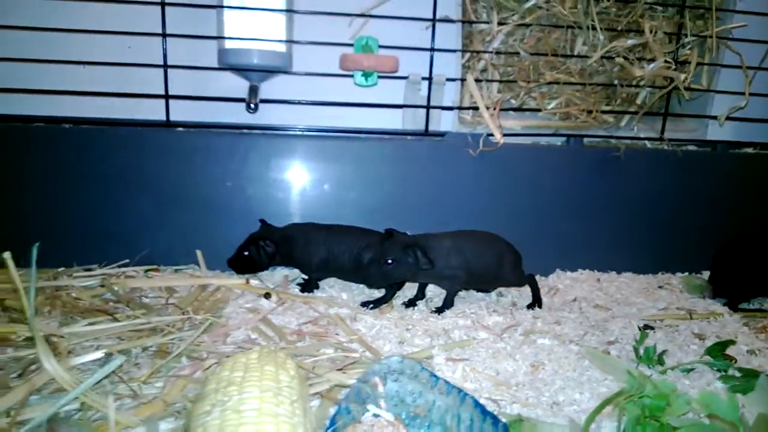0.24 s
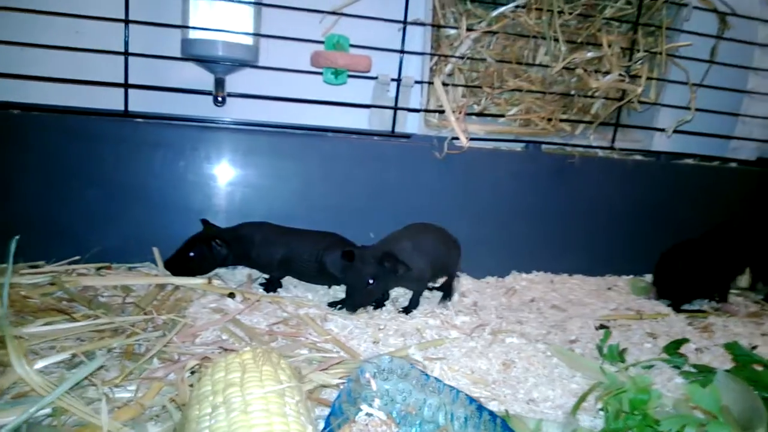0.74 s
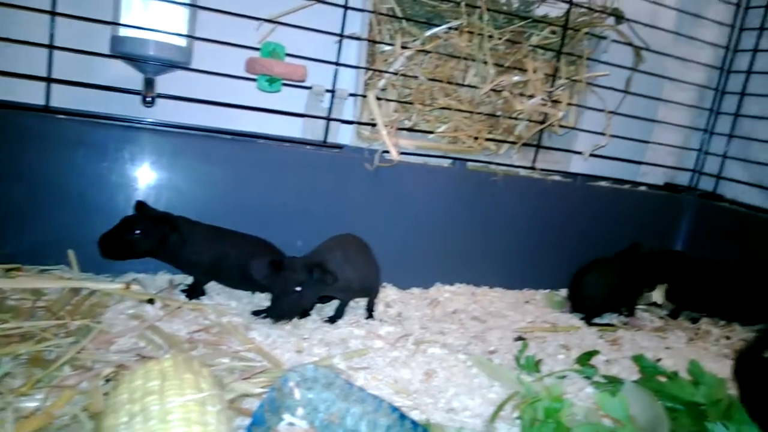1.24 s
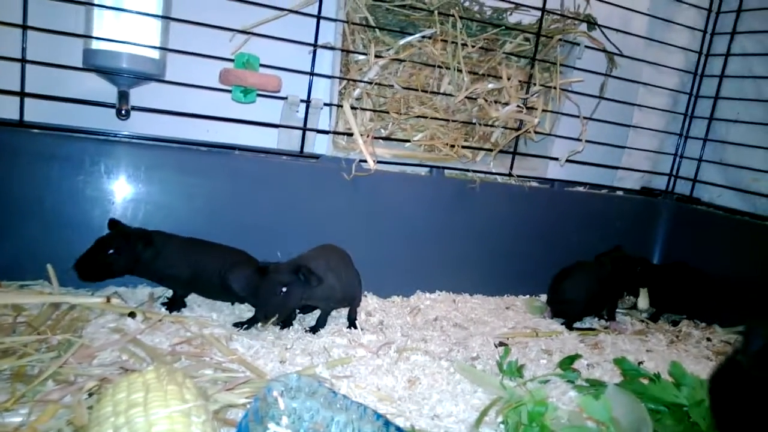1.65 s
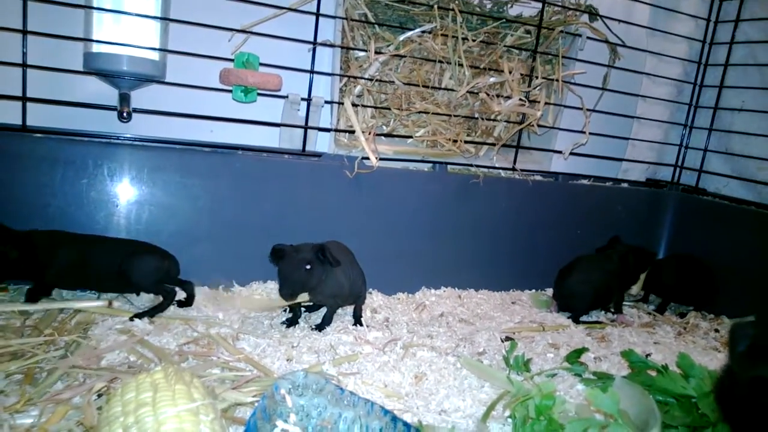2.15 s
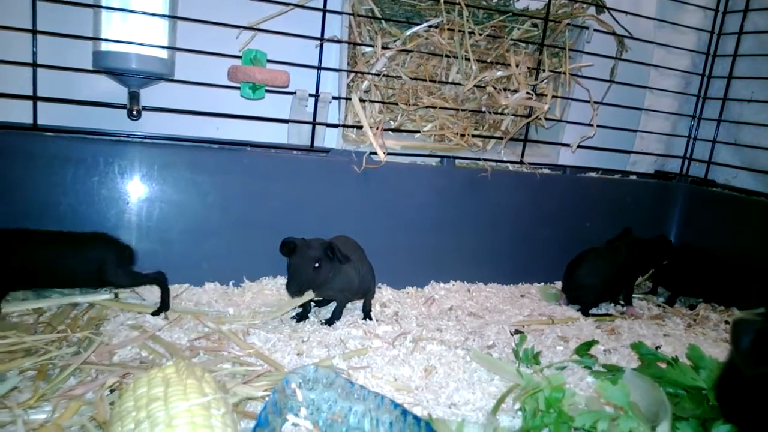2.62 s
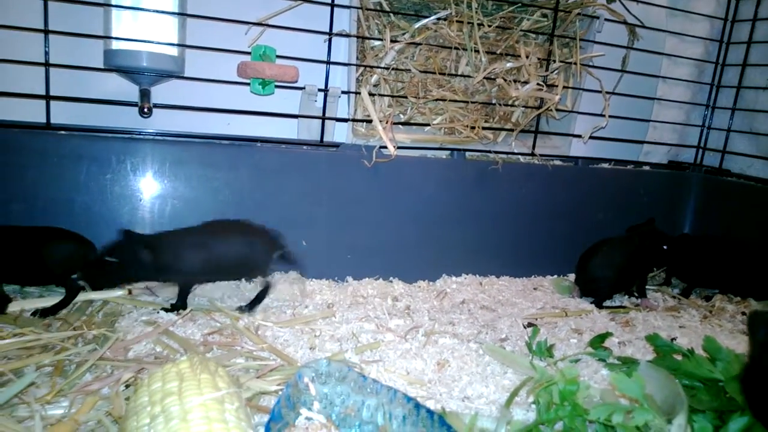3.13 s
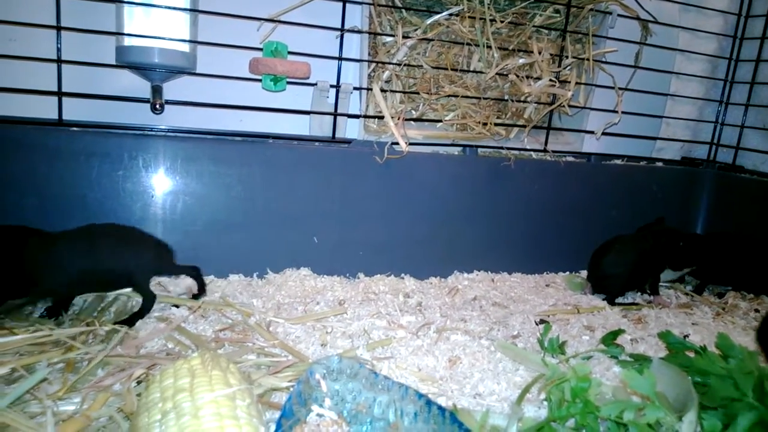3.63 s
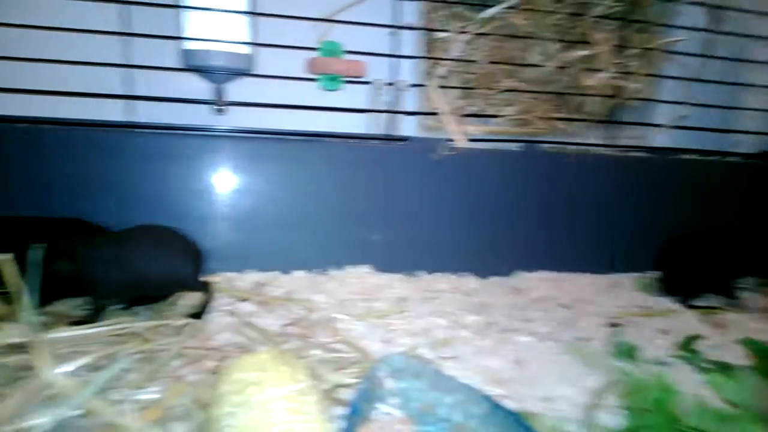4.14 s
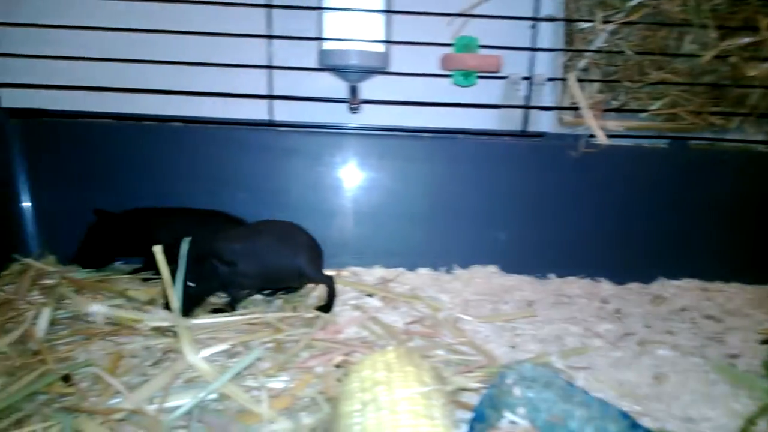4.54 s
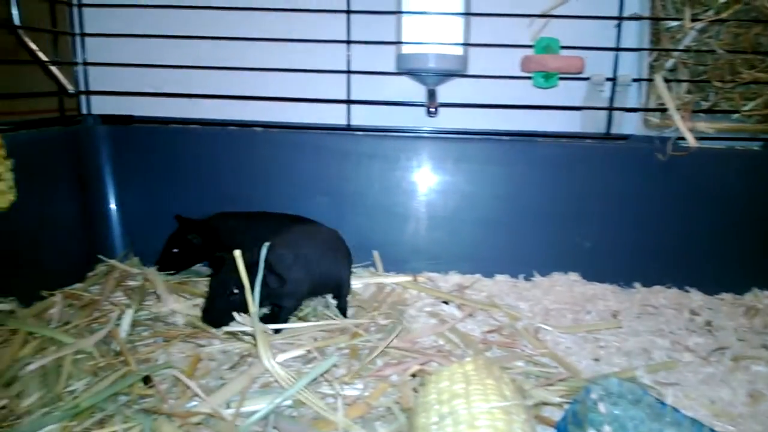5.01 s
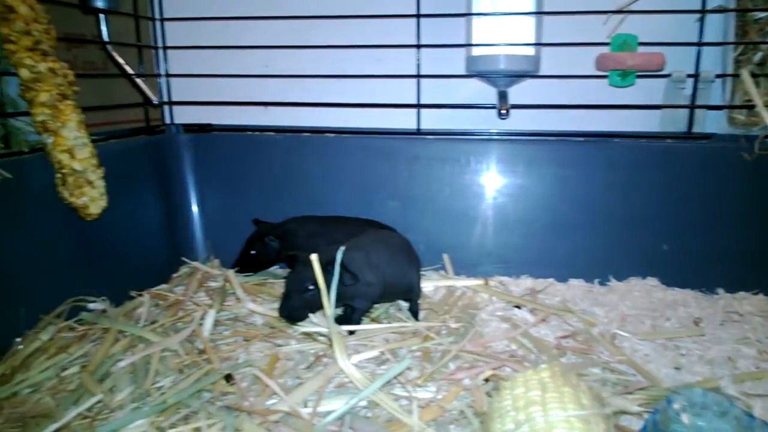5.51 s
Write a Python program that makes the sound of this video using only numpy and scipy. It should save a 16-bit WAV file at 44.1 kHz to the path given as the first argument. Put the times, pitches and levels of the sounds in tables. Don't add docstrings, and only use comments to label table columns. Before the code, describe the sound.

Young guinea pigs chirp in a plastic-floored cage: brief, nearly pure whistles, each flicking up in pitch. Faint, slightly hoarse chirps come first, then a louder run in the middle and sparse ones at the end. A dry straw snap stands out near two seconds. A hand-held microphone adds low rumble, faint hiss and irregular tiny dropout clicks.

```python
import sys
import numpy as np
from scipy import signal
from scipy.io import wavfile
from scipy.ndimage import uniform_filter1d

SR = 44100
rng = np.random.default_rng(int(sys.argv[2]) if len(sys.argv) > 2 else 0)


def linear_from_db(decibels):
    return 10 ** (np.asarray(decibels, float) / 20)


def master_out(mix):
    frames = np.transpose(np.atleast_2d(mix))
    ceiling = np.clip(frames, -1, 1)
    pcm = np.round(ceiling * 32767).astype(np.int16)
    wavfile.write(sys.argv[1], SR, pcm)


N = 254456

# (start [s], length [s], level [dB], held pitch [Hz], flick top [Hz])
NASAL_CHIRPS = [
    (.369, 0.07, -46, 637.6, 896),
    (.525, 0.07, -44, 673, 973),
]
CLEAR_CHIRPS = [
    (2.589, 0.06, -36.5, 696, 980),
    (2.740, 0.059, -35, 674, 1020),
    (2.894, .064, -37, 658, 1040),
]
BRIGHT_CHIRPS = [
    (2.445, .060, -38.5, 699, 1033),
    (3.409, .059, -36, 586.7, 934),
    (3.888, 0.067, -37.5, 620.3, 893),
    (5.74, 0.05, -38, 592.6, 853),
]
SUDDEN_CHIRPS = [
    (1.029, .068, -44.5, 670, 957),
    (1.794, 0.059, -41.5, 609, 822),
    (1.939, .054, -40.5, 611, 897),
]
SWELLING_CHIRPS = [
    (3.266, 0.065, -38, 618, 935),
    (3.585, .047, -42.5, 671, 806),
    (5.600, 0.063, -37.5, 569, 856),
]
DULL_CHIRPS = [(1.618, 0.073, -46, 641, 820), (2.098, 0.058, -42, 606.6, 880),
               (2.298, .063, -44, 645.7, 880), (3.758, .049, -44, 688.3, 879), (4.562, .038, -43, 610, 870),
               (4.719, .055, -41.5, 689, 835)]
HOARSE_CHIRPS = [
    (.205, .064, -50, 755, 981),
    (1.216, .070, -51.5, 657.6, 960),
    (1.448, 0.068, -56.5, 765, 1000),
]
PIP_CHIRPS = [(.891, .060, -51.5, 659, 987), (3.138, 0.023, -44.5, 503, 510), (3.179, 0.013, -58, 797, 830),
              (4.536, .042, -48, 1117, 852), (5.450, 0.023, -42, 514, 465), (5.488, 0.012, -39.5, 780, 754),
              (5.660, 0.019, -45.5, 692, 800)]
# (flick start before the end [s], creep [share of held pitch],
# onset relative to level [dB], end relative to level [dB])
CHIRP_SHAPES = [
    (.020, .01, -1, -4),
    (.016, .02, -6.5, -5),
    (0.024, .02, -4, -1.5),
    (.023, 0.018, 3.8, -2),
    (0.024, -.02, -11.5, -1.5),
    (.020, -0.031, -9, .5),
    (0.02, -.03, -7, 0),
    (.04, 0.0066, -10, -2.5),
]
# (octave overtone [dB], rasp [dB])
CHIRP_VOICES = [
    (-5, -10),
    (-16.5, -17),
    (-15, -14),
    (-17, -13),
    (-13.5, -11.5),
    (-26.5, -10),
    (-23, -4),
    (-37, -13.5),
]
# (time [s], peak [dB], centre [Hz], t60 [s], body under the snap [dB])
STRAW_SNAPS = [(1.539, -50, 4200, 0.016, -32), (1.8363, -53, 6870, 0.032, 13),
               (1.871, -45.5, 7310, 0.13, -11), (1.8818, -48, 7650, 0.024, -7),
               (1.889, -30, 7550, 0.019, -10), (1.901, -50, 8600, 0.053, -26),
               (1.9486, -54.5, 3700, 0.094, 3), (2.0113, -50, 5030, 0.017, -2),
               (2.071, -48, 3820, 0.043, 2), (2.61, -58, 3720, 0.036, -5),
               (3.046, -51.5, 5600, 0.091, -13.5), (3.3489, -52.5, 5710, 0.033, -18),
               (4.111, -65, 2980, 0.045, 20), (5.0106, -51.5, 4650, 0.15, -4.5),
               (5.0376, -59, 4980, 0.18, 3), (5.223, -51, 1760, 0.054, -6), (5.306, -48, 4040, 0.094, -4.5),
               (5.4246, -57.5, 7900, 0.089, 1.5)]
# (time [s], peak [dB], centre [Hz])
SHAVING_TICKS = [(2.0254, -58, 8900), (2.0308, -60, 8030), (2.0493, -58, 4450), (2.178, -62, 3320),
                 (2.3834, -60, 4270), (2.5708, -66, 3500), (5.3244, -63, 6300), (5.579, -58, 4900)]
# (frequency [Hz], width [Hz], level [dB])
STALK_MODES = [(5220, 400, -6), (7350, 700, 0), (10800, 1500, -12), (12700, 500, -7)]
# (frequency [Hz], t60 [s])
CAGE_DECAY = [(300, .12), (900, .19), (2000, .12), (8000, .07)]
# (end [s], jump at start [dB], jump at end [dB])
BUFFER_SLIPS = [(.4237, -50, -43), (.5537, -52, -47), (.5737, -39, -37), (1.0537, -66, -42),
                (2.3137, -46, -59), (2.3237, -66, -46), (2.4737, -51, -34), (2.4937, -34, -40),
                (2.5037, -53, -48), (2.6337, -40, -41), (2.7937, -57, -31), (2.9537, -58, -33),
                (3.2837, -40, -43), (3.2937, -60, -37), (3.4337, -42, -33), (3.4537, -66, -38),
                (3.5937, -45, -37), (3.6237, -53, -39), (3.9137, -41, -42), (3.9237, -66, -39),
                (4.5837, -66, -44), (4.7237, -43, -50),
                (.2537, -52, -55), (.2637, -49, -58), (1.1937, -53, -51), (1.3837, -61, -51),
              (1.8537, -61, -51), (3.7537, -53, -53), (4.2337, -53, -66), (4.3937, -52, -61),
              (4.5537, -66, -51), (5.1937, -66, -52), (.7237, -53, -46), (1.2237, -48, -56),
              (1.3537, -43, -55), (1.3637, -46, -66), (2.8237, -41, -41), (2.9837, -52, -44),
              (3.1137, -66, -48), (3.1237, -52, -46), (3.1337, -53, -51), (4.0837, -45, -41),
              (4.1037, -48, -42), (4.8937, -60, -48), (5.0337, -58, -44), (5.0437, -50, -53),
              (5.2237, -49, -66), (5.5137, -66, -41), (5.5337, -57, -48), (5.6937, -40, -47)]
# (frequency [Hz], level [dB])
ROOM_BOOMS = [(28, -6.5), (49, -2.5), (88, -1)]
# (time [s], effort [dB])
HAND_EFFORT = [(0.0, -47.5), (0.11, -64), (0.26, -50.5), (0.48, -55), (1.39, -55), (2.97, -49.5),
               (3.19, -61.5), (3.27, -52), (3.58, -50.5), (3.83, -60.5), (4.03, -49), (4.33, -58),
               (4.59, -52.5), (4.62, -58), (5.42, -47.5), (5.45, -50.5), (5.7, -51.5), (5.76, -54)]
# (time [s], level [dB])
MACHINE_LEVEL = [(0.0, -60), (1.59, -65), (2.95, -50.5), (3.11, -63.5), (3.53, -51), (3.75, -76),
                 (3.9, -61.5), (5.63, -60), (5.76, -71.5)]
# (frequency [Hz], level per Hz [dB])
RUMBLE_SPECTRUM = [(15, -3), (30, -6.5), (70, -1), (110, 2.5), (145, 0.5), (175, -13), (260, -24.5),
                   (400, -46.5)]
# (start [s], dying time [s], level [dB])
SCUFF_EVENTS = [(1.8, 0.43, -73.5), (4.928, .06, -68.5), (5.0, 0.26, -78.5), (5.223, 0.18, -62),
                (5.398, 0.29, -62), (5.6, 0.39, -68.5)]
# (frequency [Hz], level per Hz [dB])
SCUFF_SPECTRUM = [(120, -21), (200, 1), (320, 5.5), (450, -6), (800, -9), (1900, -16.5), (5000, -72)]
# (frequency [Hz], level per Hz [dB])
HISS_SPECTRUM = [(300, -12), (800, -5), (1600, -2.5), (2800, -4), (4500, -3.5), (5500, -7.5), (6800, -8),
                 (8300, -11.5), (15500, -17.5)]
# (multiple of its base pitch, level [dB])
WHINE_COMB = [(5, -91), (6, -90), (7, -97), (8, -91), (9, -93)]


def evened(x):
    return x / np.sqrt(np.mean(x ** 2) + 1e-20)


def wander(x, first, second):
    return evened(uniform_filter1d(uniform_filter1d(x, size=first), size=second))


def read(points, hz):
    f, value = np.transpose(points)
    return np.interp(np.log(hz + 1), np.log(f + 1), value)


def add(mix, s, sound):
    part = mix[round(s * SR):][:len(sound)]
    part += sound[:len(part)]


def resonate(x, hz, width):
    turn = np.exp(2j * np.pi * np.cumsum(hz * np.ones(len(x))) / SR)
    r = np.exp(-np.pi * width / SR)
    return 2 * (turn * signal.lfilter([1 - r], [1, -r], x / turn)).real


def contour(start, length, level_db, hz, top_hz, flick_s, creep, onset_db, end_db):
    attack_s, top_s, release_s = 0.003, 0.0083, 0.007
    catch_db, silent_db = -2, -22
    flick = length - min(flick_s, 0.6 * length)
    top = length - min(top_s, 0.2 * length)
    scoop_end = 0.42 * flick
    full = min(0.48 * length, flick)
    close = length - min(release_s, 0.14 * length)
    s = np.sort([0, attack_s, scoop_end, full, flick, (flick + top) / 2, top, close, length])
    pitch = np.interp(s, [0, scoop_end, flick, top, length],
                      [0.79 * hz, hz * (1 - creep), hz * (1 + creep), top_hz, 0.94 * top_hz])
    rise = np.interp(s, [0, attack_s, full], [silent_db, onset_db, 0])
    fall = np.interp(s, [full, flick, top, close, length], [0, catch_db, end_db, end_db, silent_db])
    return np.transpose([start + s, level_db + rise + fall, pitch])


def chirp(rows, overtones):
    s, level_db, pitch = np.transpose(rows)
    octave_db, rasp_db = overtones
    t = np.arange(s[0], s[-1], 1 / SR)
    shake, shimmer, flap, air = rng.standard_normal((4, len(t)))
    rasp = min(linear_from_db(rasp_db), 1)

    glide = uniform_filter1d(np.interp(t, s, pitch), size=70, mode="nearest")
    hz = glide * (1 + 0.11 * rasp * wander(shake, 110, 60))
    turn = 2 * np.pi * np.cumsum(hz) / SR

    nose_hz, nose_width_hz = 1388, 200
    nose = 1.3 / (1 + ((2 * hz - nose_hz) / nose_width_hz) ** 2)
    octave = linear_from_db(octave_db) * nose * (1 + 0.4 * wander(shimmer, 110, 60))
    octave = octave * (np.cos(2 * turn) + 0.2 * np.sin(3 * turn))
    thin = 1 / (1 + (hz / 900) ** 10)
    strength = 1 + 0.5 * rasp * wander(shimmer[::-1], 110, 60)
    voice = np.sqrt(2) * (strength * np.sin(turn) + thin * octave)

    uneven = evened(resonate(resonate(flap, 3 * hz / 2, 130), 3 * hz / 2, 130))
    breath = evened(resonate(resonate(air, 820, 1000), 820, 1000))
    rough = rasp * (0.9 * thin * uneven + 0.33 * breath)

    shape = linear_from_db(uniform_filter1d(np.interp(t, s, level_db), size=60))
    shape = shape * signal.windows.tukey(len(t), 0.18)
    mouth = signal.butter(4, (380, 1780), "band", fs=SR, output="sos")
    return s[0], signal.sosfiltfilt(mouth, shape * (voice + rough))


def snap(s, peak_db, hz, t60, body_db):
    t = np.arange(5000) / SR
    a, b, gate = rng.standard_normal((3, len(t)))
    fade = linear_from_db(-60 * t / np.clip(t60, 0.005, 0.12))
    trail = 0.45 * (0.4 + (abs(gate) > 1.8)) * fade
    cracks = a * (linear_from_db(-60 * t / 0.015) + trail)
    stalk = sum(linear_from_db(db) * resonate(cracks, f, width) for f, width, db in STALK_MODES)
    hard = np.clip((peak_db + 55) / 20, 0, 1)
    soft = evened(resonate(resonate(cracks, hz, 1400), hz, 3500))
    crisp = soft + hard * (2.6 * evened(stalk) + 0.3 * evened(cracks))
    body = resonate(resonate(b * fade, 680, 940), 680, 990)
    return s, linear_from_db(peak_db) * (crisp / abs(crisp).max() + linear_from_db(body_db) * body / abs(body).max())


def cage(x):
    taps = np.zeros(SR // 4)
    at = np.arange(200, len(taps) - 20, 20)
    taps[at + rng.integers(0, 20, len(at))] = rng.choice([-1., 1.], len(at))
    hz, t, z = signal.stft(taps, SR, nperseg=256)
    t60 = np.maximum(read(CAGE_DECAY, hz), 0.01)[:, None]
    tail = signal.istft(z * linear_from_db(-60 * t / t60), SR, nperseg=256)[1]
    return signal.fftconvolve(x, tail / np.linalg.norm(tail))[:N]


def boom(hz, db, level_db):
    drift = 1.3 * wander(rng.standard_normal(N), 6000, 6000)
    return np.sqrt(2) * linear_from_db(db + level_db) * np.sin(2 * np.pi * hz * np.arange(N) / SR + drift)


def noise(spectrum, patchy_db, size):
    hz = np.fft.rfftfreq(size, 1 / SR)
    a, b, patches = rng.standard_normal((3, len(hz), N // (size // 4) + 5))
    patches = evened(uniform_filter1d(uniform_filter1d(patches, size=8, axis=0), size=8, axis=1))
    z = (a + 1j * b) * linear_from_db(read(spectrum, hz)[:, None] + patchy_db * patches)
    return evened(signal.istft(z, nperseg=size, noverlap=size * 3 // 4)[1][:N])


def scuffing(t):
    rise_s = 0.02
    rub = linear_from_db(-73)
    for s, dying, db in SCUFF_EVENTS:
        rub = rub + linear_from_db(db) * np.interp(t - s, [0, rise_s, rise_s + dying], [0, 1, 0])
    return linear_from_db(6.0) * rub * noise(SCUFF_SPECTRUM, patchy_db=2.1, size=512)


def electronics(t):
    base_hz = 724.2
    whine = sum(np.sqrt(2) * linear_from_db(db) * np.sin(2 * np.pi * k * base_hz * t) for k, db in WHINE_COMB)
    return whine + linear_from_db(-74.5) * noise(HISS_SPECTRUM, patchy_db=2.04, size=512)


def background():
    t = np.arange(N) / SR
    hands_db = np.interp(t, *np.transpose(HAND_EFFORT))
    machine_db = np.interp(t, *np.transpose(MACHINE_LEVEL))
    drives_db = (hands_db - 5, hands_db - 5, machine_db)
    booms = sum(boom(hz, db, drive_db) for (hz, db), drive_db in zip(ROOM_BOOMS, drives_db))
    rumble = linear_from_db(hands_db - 3) * noise(RUMBLE_SPECTRUM, patchy_db=3.0, size=2048)
    grip = linear_from_db(2.2 * wander(rng.standard_normal(N), 2500, 2500))
    return grip * (booms + rumble) + np.sqrt(grip) * scuffing(t) + electronics(t)


def scene():
    near = np.zeros(N)
    manners = (NASAL_CHIRPS, CLEAR_CHIRPS, BRIGHT_CHIRPS, SUDDEN_CHIRPS,
               SWELLING_CHIRPS, DULL_CHIRPS, HOARSE_CHIRPS, PIP_CHIRPS)
    for rows, shape, voice in zip(manners, CHIRP_SHAPES, CHIRP_VOICES):
        for row in rows:
            add(near, *chirp(contour(*row, *shape), voice))
    for row in STRAW_SNAPS:
        add(near, *snap(*row))
    for tick in SHAVING_TICKS:
        add(near, *snap(*tick, t60=0.048, body_db=-10))
    return (near + linear_from_db(-17) * cage(near) + background())[None]


def slips():
    first_s, cycle_s, step_s, unit_s = 0.2337, 0.16, 0.01, 32 / 48000
    for s, *jumps_db in BUFFER_SLIPS:
        place = round((s - first_s) / step_s) % round(cycle_s / step_s)
        yield s, (4 - place) * unit_s, *jumps_db


def slipped(x):
    buffer_s = 4096 / 48000
    out, stale = x.copy(), np.roll(x, round(buffer_s * SR))
    gap = stale - x
    slide = np.arange(-38, 39)
    for s, length, *jumps_db in slips():
        edges = np.round(np.array([s - length, s]) * SR).astype(int)
        jumps = linear_from_db(np.array(jumps_db))
        misfit = (abs(gap[edges[:, None] + slide]) - jumps[:, None]) ** 2
        start, end = edges + slide[misfit.argmin(1)]
        end = max(end, start + 12)
        drift = np.sign(gap[[start, end]]) * jumps - gap[[start, end]]
        out[start:end] = stale[start:end] + np.linspace(*drift, end - start)
    return out


def band_limit(x):
    return signal.sosfilt(signal.butter(12, 16430, fs=SR, output="sos"), x)


def record(dry):
    edge = signal.firwin(301, 15900, window=("kaiser", 9), fs=SR)
    mix = signal.oaconvolve(slipped(dry[0]), edge, "same")[None]
    return band_limit(mix)


dry = scene()
out = record(dry)
master_out(out)
```